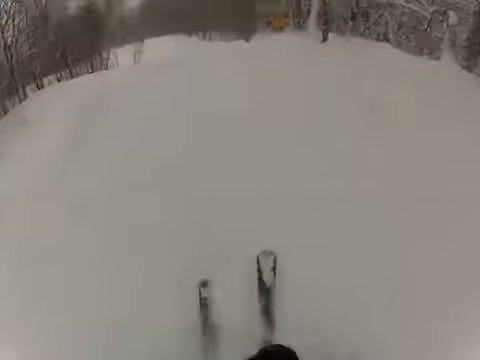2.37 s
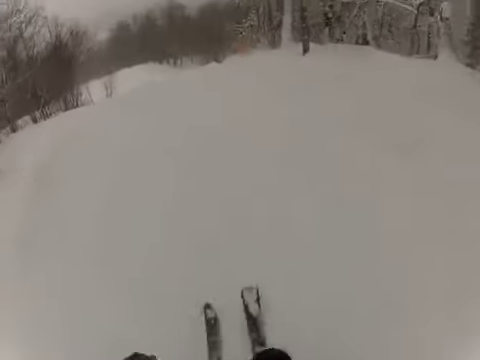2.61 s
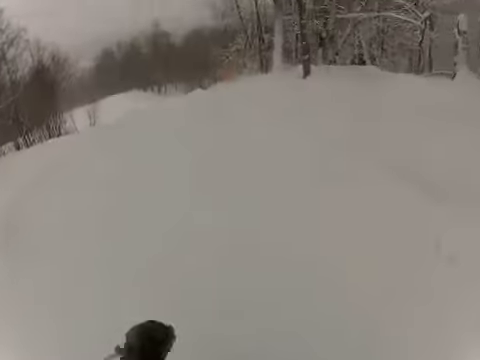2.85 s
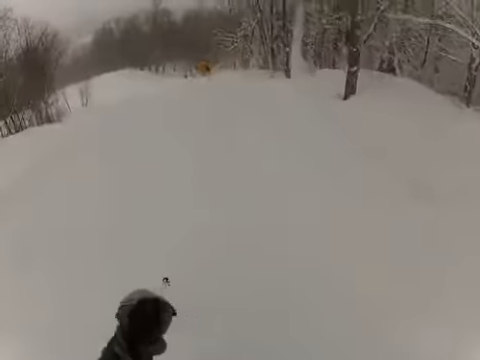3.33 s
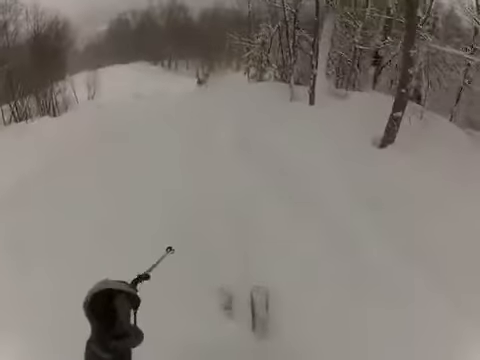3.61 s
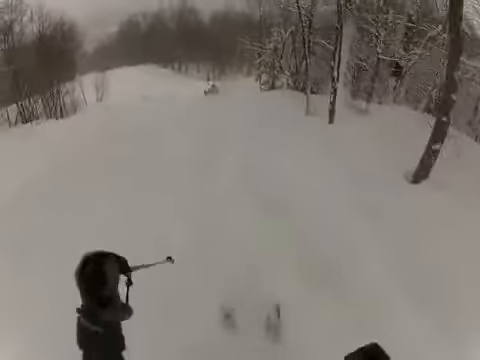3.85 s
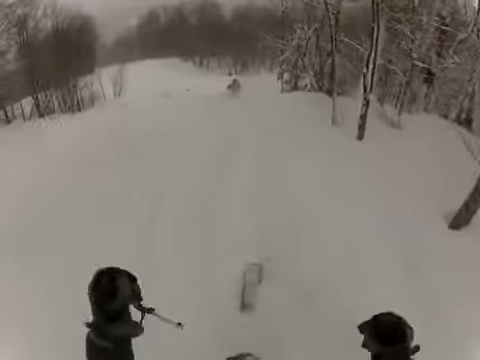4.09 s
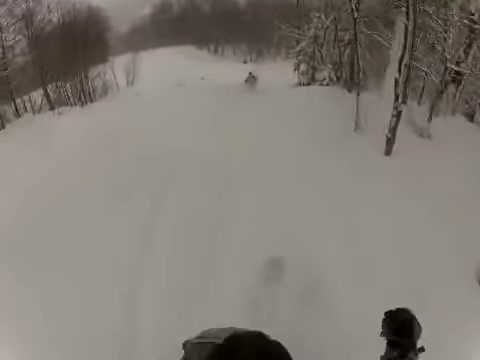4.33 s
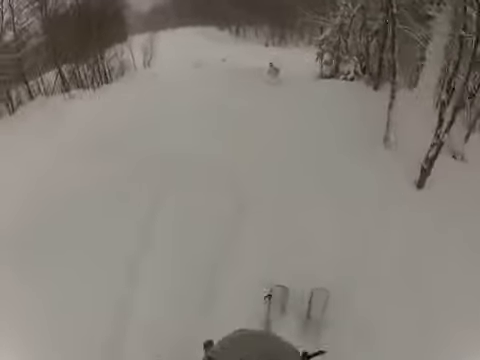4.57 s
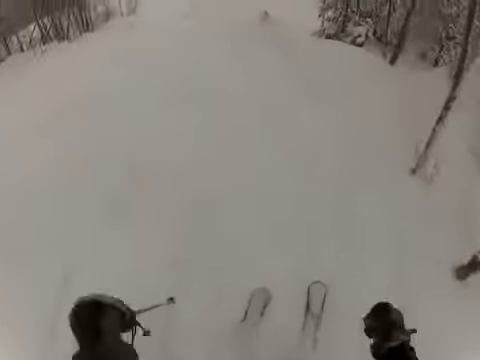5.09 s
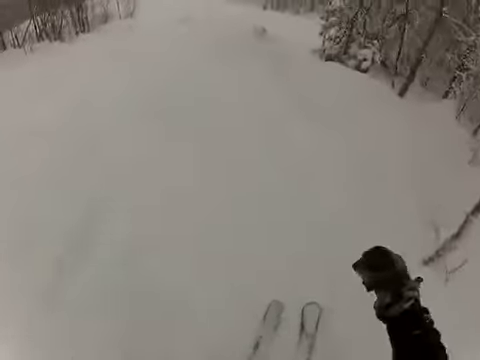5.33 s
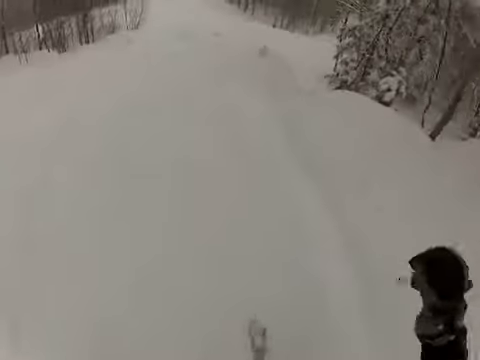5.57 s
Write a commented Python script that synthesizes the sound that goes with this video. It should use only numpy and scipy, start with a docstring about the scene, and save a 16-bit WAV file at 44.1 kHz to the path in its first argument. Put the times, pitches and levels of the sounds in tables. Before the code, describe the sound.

Close, muffled powder-skiing noise: soft snow hiss, icy crackle, sharp plastic ticks, and deep crunchy bumps around one and nearly five seconds.

```python
"""On a slope of deep powder a skier glides along, heard by a camera in a sealed plastic case on the chest.
Snow spray hisses as flickering noise, and wind and body motion shake the mount as slow, deep noise.
Snow lumps and ice grains crackle on the case as random small taps and scratches.
Bumps push the mount so that it rings low and crunches.
A loose part ticks, rattles and glances off, which rings the case and adds bright scuffs."""
import sys
import numpy as np
from scipy import signal
from scipy.fft import rfft, irfft, next_fast_len
from scipy.io import wavfile

SR = 44100
rng = np.random.default_rng(int(sys.argv[2]) if len(sys.argv) > 2 else 0)


def convert_level_to_amplitude(level_db):
    """Map a level in decibels to its linear amplitude factor."""
    exponent = np.asarray(level_db, float) / 20
    return 10 ** exponent


def wav_out(sig):
    """Save sig, one row per channel (or a flat mono array), as 16-bit PCM at SR to the path in sys.argv[1]."""
    wavfile.write(sys.argv[1], SR, np.round(np.clip(np.atleast_2d(sig).T, -1, 1) * 32767).astype(np.int16))


N = 251359   # length in samples, about 5.7 s

# The tones at which the plastic case rings.
# Each row: frequency in Hz, relative level in dB, time to die away by 60 dB in seconds.
CASE_MODES = [(664, -32.5, 0.029), (1350, -4, 0.0059), (1732, -3, 0.012), (1983, -2.5, 0.0062),
              (2333, 0, 0.011), (3144, -6, 0.012), (3578, -7.5, 0.023), (6670, -41, 0.011),
              (8360, -13, 0.015), (9520, -19.5, 0.021), (9800, -10.5, 0.013), (10920, -0.5, 0.022)]
# The tone colour of something scraping over the case. Each row: frequency in Hz, relative level in dB.
SCUFF_COLOUR = [(2500, -31.5), (3500, -10), (5400, -3.5), (6000, -24.5), (6600, -5.5), (8000, -11.5),
                (10000, -39)]


def low_pass(x, hz):
    """One-pole smoothing: each output value moves only part of the way towards the input."""
    r = np.exp(-2 * np.pi * hz / SR)
    return signal.lfilter([1 - r], [1, -r], x)


def rms_one(x):
    """Scales a signal to an rms of 1."""
    return x / np.sqrt(np.mean(x ** 2) + 1e-20)


def drift(rate_hz):
    """A slow random wander of spread 1: twice-smoothed noise, drawn once every 40 samples."""
    r = np.exp(-80 * np.pi * rate_hz / SR)
    white = rng.standard_normal(N // 40 + 2002)
    slow = signal.lfilter([1], [1, -2 * r, r * r], white)[2000:]   # skip the filter's start-up
    return np.interp(np.arange(N) / 40, np.arange(len(slow)), rms_one(slow))


def coloured_noise(spectrum, patchy_db, flicker_per_s):
    """Noise of a given tone colour whose octaves flicker partly together, partly alone; rms 1."""
    size = next_fast_len(N)
    hz = np.maximum(np.arange(size // 2 + 1) * SR / size, 1)
    point_hz, point_db = np.transpose(spectrum)
    colour_db = np.interp(np.log(hz), np.log(point_hz), point_db, -90, -90)
    shaped = rfft(rng.standard_normal(size)) * convert_level_to_amplitude(colour_db)
    out, together = 0, drift(flicker_per_s)
    lowest, highest = np.floor(np.log2(point_hz[0])), np.log2(point_hz[-1])
    for octave in np.arange(lowest, highest + 1):
        share = np.clip(1 - np.abs(np.log2(hz) - octave), 0, 1)   # neighbouring octaves overlap
        flicker = convert_level_to_amplitude(patchy_db * (together + drift(flicker_per_s)))
        out = out + irfft(shaped * share, size)[:N] * flicker
    return rms_one(out)


def ring(force, modes):
    """A force (one for all modes, or a row per mode) sets every mode ringing, neighbours in opposite sign."""
    out, force = np.zeros(N), np.broadcast_to(force, (len(modes), N))
    for k, (hz, level_db, t60) in enumerate(modes):
        r = convert_level_to_amplitude(-60 / (t60 * SR))   # loss per sample
        w = 2 * np.pi * hz / SR   # turn per sample
        resonator = [1, -2 * r * np.cos(w), r * r]
        tone = signal.lfilter([0, np.sin(w)], resonator, force[k] + 1e-18)
        out += (-1) ** k * convert_level_to_amplitude(level_db) * tone
    return out


def spray_hiss(hiss_db):
    """Snow spray is a rush of noise: louder with speed, arriving in quick uneven puffs."""
    # The hiss of the spray. Each row: frequency in Hz, relative level in dB.
    hiss_colour = [(250, -7.5), (330, -3.5), (480, -13.5), (600, -4.5), (720, -11.5), (980, -15),
                   (1270, -1.5), (2200, 1), (2800, -12), (3550, -8.5), (4300, -23.5), (5450, -22.5),
                   (6000, -37.5), (6600, -24), (7600, -29.5), (8400, -16), (9000, -23.5), (9800, -11.5),
                   (10500, -1.5)]
    gust_db = 1.5
    puffs = convert_level_to_amplitude(hiss_db + gust_db * drift(36))
    return puffs * coloured_noise(hiss_colour, patchy_db=1.1, flicker_per_s=34)


def mount_shake(hiss_db, force):
    """Wind and body motion shake the mount; speed changes act slowly and bumps leave a brief shudder."""
    # The deep noise of the shaking. Each row: frequency in Hz, relative level in dB.
    shake_colour = [(8.8, -14.5), (15, 5.5), (27, -2), (48, -10), (86, -1), (106, 1.5), (147, -12.5),
                    (300, -22.5), (390, -37.5), (660, -120)]
    shake_db, follows = -48.5, 0.53   # level at mean speed; share of the swing in speed
    lag_hz = 2.5   # the body takes up a change of speed slowly
    shudder_db, shudder_hz = 8, 5
    swing_db = follows * low_pass(hiss_db - hiss_db.mean(), lag_hz)
    shudder = SR / 1000 * low_pass(low_pass(force, shudder_hz), shudder_hz)   # push per ms
    shaking = convert_level_to_amplitude(shake_db + swing_db) + convert_level_to_amplitude(shudder_db) * shudder
    return shaking * coloured_noise(shake_colour, patchy_db=2.5, flicker_per_s=6.8)


def scratches(per_s, length_hz):
    """Envelope of short random contacts of very uneven size, in clumps; a higher length_hz is shorter."""
    sizes = convert_level_to_amplitude(5.0 * np.minimum(rng.exponential(1, N), 3.5))
    chance = np.maximum(per_s, 0) * convert_level_to_amplitude(4 * drift(6)) / SR   # the wander makes the clumps
    born = rng.random(N) < chance
    return low_pass(sizes * born, length_hz) * SR / (2 * np.pi * length_hz)


def crackle(hiss_db):
    """Lumps of snow tap the case dully, ice grains graze it brightly; both grow a little with the glide."""
    taps_per_s = 160   # typical rate, before clumping
    rough = scratches(taps_per_s, length_hz=119) * rng.standard_normal(N)
    lumps = low_pass(low_pass(rough, hz=2260), hz=2260)
    grain_envelope = scratches(taps_per_s / 10, length_hz=70) ** 0.45   # evens out the sizes
    grains = grain_envelope * coloured_noise(SCUFF_COLOUR, patchy_db=-2.5, flicker_per_s=46)
    return convert_level_to_amplitude(.5 * hiss_db) * (convert_level_to_amplitude(-45.0) * ring(lumps, CASE_MODES) + convert_level_to_amplitude(-42.5) * grains)


def pushes():
    """Each bump is a half-sine push; a long push favours the lowest mode."""
    # Bumps that reach the mount. Each row: middle of the push in seconds, strength in dB, length in ms.
    bump_list = [(0.065, -40, 3.5), (0.448, -33, 4), (0.819, -25, 3.45), (1.054, -26.5, 4.1),
                 (1.268, -7, 13), (1.306, -19.5, 9.1), (1.340, -12, 3.5), (1.499, -18.5, 3.8),
                 (1.838, -39.5, 3.7), (2.578, -28.5, 9.1), (2.91, -29.5, 6.8), (3.287, -35, 3.16),
                 (3.34, -27.5, 3.16), (4.556, -15, 3.9), (4.62, -29.5, 3.7), (4.676, -32, 6.2),
                 (4.707, -21.5, 10), (4.743, -8, 11.5), (4.762, -10.5, 3.6), (4.781, -16.5, 4.7),
                 (4.822, -21.5, 4.2), (4.912, -19, 3.6), (4.942, -25.5, 3.6), (4.962, -19, 3.8),
                 (4.995, -28.5, 6), (5.487, -39.5, 3.5)]
    force = np.zeros(N)
    for middle_s, strength_db, push_ms in bump_list:
        length = max(round(push_ms * SR / 1000), 3)
        push = np.sin(np.linspace(0, np.pi, length))
        at = round(middle_s * SR) - length // 2
        force[at:at + length] += convert_level_to_amplitude(strength_db + 3.5) * push / push.sum()
    return force


def bumps(force):
    """Pushes ring the mount; pushes and hard swings make the joint crunch."""
    # The tones at which the mount rings.
    # Each row: frequency in Hz, relative level in dB, time to die away by 60 dB in seconds.
    mount_modes = [(53.7, -7.5, 0.054), (96.7, 0.5, 0.17), (166.7, -5.5, 0.038), (345.4, -2, 0.042),
                   (636, 3.5, 0.062)]
    # The crunch of the joint. Each row: frequency in Hz, relative level in dB.
    crunch_colour = [(200, 10.5), (350, -1.5), (600, 2.5), (900, -12), (1300, 0.5), (2200, -3),
                     (3500, -29.5), (6000, -40.5), (9700, -15.5)]
    swing = ring(force, mount_modes)
    swing_strain = convert_level_to_amplitude(-17) * low_pass(np.abs(swing), hz=60) ** 1.383   # hard swings count for more
    push_strain = convert_level_to_amplitude(16.0) * low_pass(force, hz=25)
    crunch = coloured_noise(crunch_colour, patchy_db=3.5, flicker_per_s=47)
    return swing + (swing_strain + push_strain) * crunch


def loose_part_hits():
    """Lists the loose part's ticks, lingering rattles and glancing hits, each with its kind of contact."""
    # Clean ticks on the case. Each row: start in seconds, strength in dB.
    ticks = [(0.0947, -21), (0.598, -18.5), (0.7497, -16), (1.0035, -18.5), (1.1463, -16), (1.2795, -14.5),
             (1.4536, -15.5), (1.5504, -18.5), (1.8273, -17.5), (2.177, -20), (2.434, -17.5),
             (2.6346, -15.5), (3.3597, -17), (3.7556, -15.5), (4.1538, -20.5), (4.6061, -17), (4.6781, -29),
             (4.9425, -32), (5.449, -15.5)]
    # Dull rattles, where the contact lingers. Each row: start in seconds, strength in dB.
    rattles = [(0.8195, -31), (0.912, -25.5), (1.358, -15.5), (1.641, -24.5), (2.5672, -26),
               (3.0455, -32.5), (3.2863, -38.5), (3.338, -34.5), (3.687, -43), (4.4005, -35),
               (4.6473, -31.5), (4.6973, -25.5), (4.7527, -27.5), (4.7622, -20), (4.7741, -21),
               (4.9629, -39), (5.0382, -40)]
    # Glancing hits with a bright scuff. Each row: start in seconds, strength in dB, contact time in ms.
    glances = [(0.4863, -38, 1.2), (1.1754, -28.5, 4.5), (1.2914, -31, 5.7), (1.3386, -25.5, 2.4),
               (1.4636, -28, 0.48), (1.4781, -33, 3.1), (1.6752, -25, 0.28), (1.8838, -31.5, 2.2),
               (1.8912, -40.5, 2.1), (2.0492, -22.5, 0.35), (4.9142, -38, 1.4), (5.079, -49, 1.7),
               (5.162, -49.5, 0.9), (5.251, -46, 1), (5.369, -43.5, 0.78), (5.477, -46, 2.5),
               (5.519, -44.5, 3), (5.5263, -43, 2.4), (5.574, -45, 0.47), (5.6214, -43, 1.8)]
    # each hit: start in s, strength in dB, scuff against strength in dB, contact time in ms,
    # and dulling in dB per octave above 2 kHz: a soft contact spares the high modes
    hits = [(s, db, -30.5, 0.86, 0) for s, db in ticks]
    hits += [(s, db, -30.5, 2.83, -10) for s, db in rattles]
    hits += [(s, db, -10, ms, 0) for s, db, ms in glances]
    return hits


def knocks():
    """A clean hit followed by a dull dying chatter rings the case; a glancing hit adds a bright scuff."""
    hits = loose_part_hits()
    force, scuffing = np.zeros((len(CASE_MODES), N)), np.zeros(N)
    t = np.arange(round(.05 * SR)) / SR
    chatter = 3.06 * low_pass(rng.standard_normal((len(hits), len(t))), hz=1620)
    octaves = np.maximum(np.log2(np.array(CASE_MODES)[:, :1] / 2000), 0)   # above 2 kHz
    # each hit lands on another spot and weights the modes anew
    spread_db = 1.85
    spots = convert_level_to_amplitude(spread_db * rng.standard_normal((len(hits), len(CASE_MODES), 1)))
    for (start_s, strength_db, scuff_db, contact_ms, dull_db), rough, spot in zip(hits, chatter, spots):
        contact_s = max(contact_ms, .05) / 1000
        # long contacts chatter most
        blow = max(contact_ms - 1.3, .15) * rough * np.exp(-t / contact_s)
        blow[0], blow[round(.00043 * SR)] = 3.0, 6.0   # the part touches, then lands
        blow = blow / np.sqrt(np.sum(blow ** 2))
        at = round(start_s * SR)
        span = slice(at, at + len(t))
        force[:, span] += convert_level_to_amplitude(strength_db - 3.5 + dull_db * octaves) * spot * blow
        scuffing[span] += convert_level_to_amplitude(strength_db + scuff_db) * np.exp(-t / (2.72 * contact_s))
    scuff = scuffing * coloured_noise(SCUFF_COLOUR, patchy_db=-1.5, flicker_per_s=44)
    return ring(force, CASE_MODES) + scuff


def scene():
    """Hiss, shaking, crackle, bumps and knocks reach one microphone."""
    # Speed through the powder, given as the hiss of the spray. Each row: time in seconds, level in dB.
    speed = [(0, -54.5), (.45, -45), (1.36, -43), (1.8, -50.5), (2.3, -54), (2.9, -52.5), (3.4, -65.5),
             (4.3, -63), (4.52, -66), (4.7, -58), (5.0, -57), (5.11, -67), (5.4, -62.5), (5.7, -55)]
    hiss_db = np.interp(np.arange(N) / SR, *np.transpose(speed))
    force = pushes()
    snow = spray_hiss(hiss_db) + crackle(hiss_db)
    mount = mount_shake(hiss_db, force) + bumps(force)
    return (snow + mount + knocks())[None]   # one channel


def top_cut(x):
    """Nothing passes above the cut-off."""
    return signal.sosfilt(signal.butter(12, 11480, fs=SR, output="sos"), x)


def record(dry):
    """The microphone adds its own faint noise; the top is cut steeply."""
    # The microphone's own noise. Each row: frequency in Hz, relative level in dB.
    mic_colour = [(150, 2), (400, 1.5), (1000, -10), (3000, -19.5), (5500, -17.5), (6000, -37),
                  (6600, -23.5), (10500, -22)]
    noise_db, cutoff_hz = -65.5, 10827
    noisy = dry + convert_level_to_amplitude(noise_db) * coloured_noise(mic_colour, patchy_db=2.0, flicker_per_s=7.9)
    steep_cut = signal.cheby2(12, 48, cutoff_hz, fs=SR, output="sos")
    finished = signal.sosfilt(steep_cut, noisy)
    return top_cut(finished)


dry = scene()
out = record(dry)
wav_out(out)
```